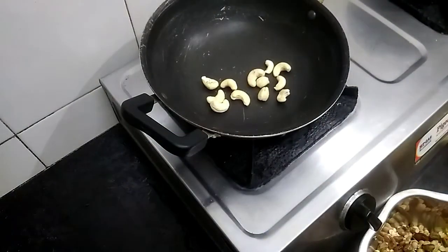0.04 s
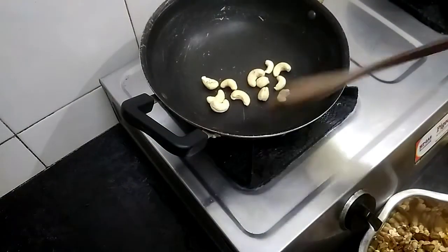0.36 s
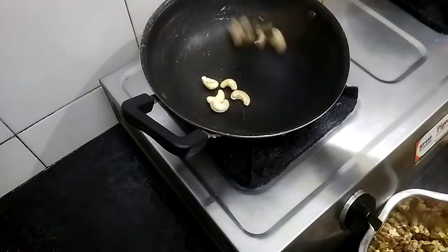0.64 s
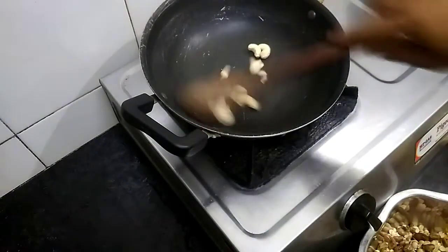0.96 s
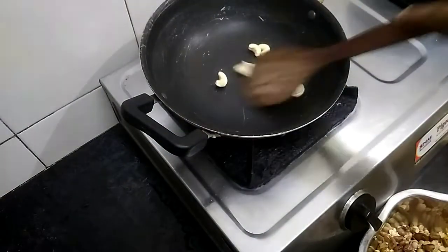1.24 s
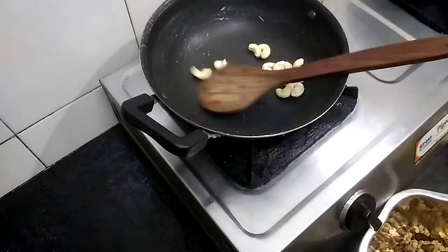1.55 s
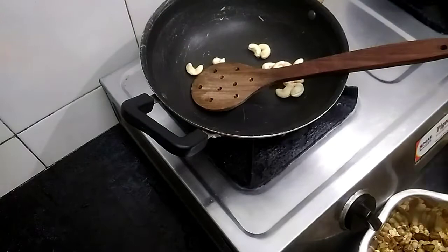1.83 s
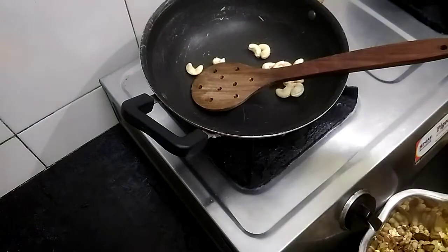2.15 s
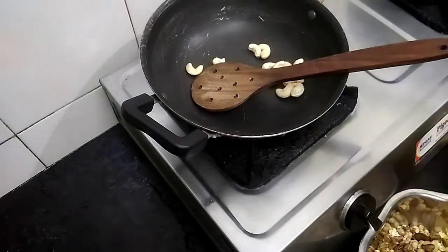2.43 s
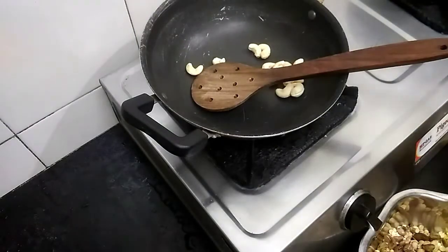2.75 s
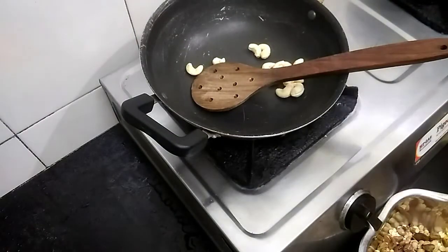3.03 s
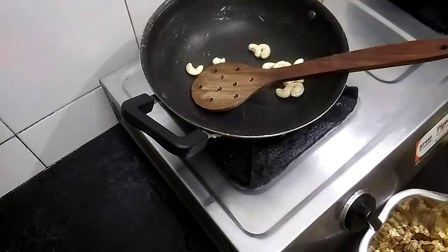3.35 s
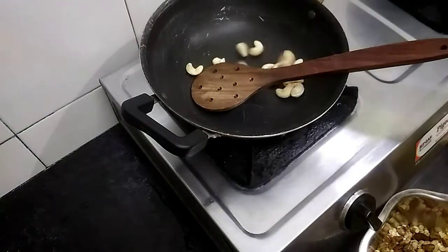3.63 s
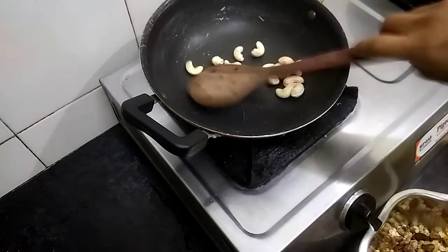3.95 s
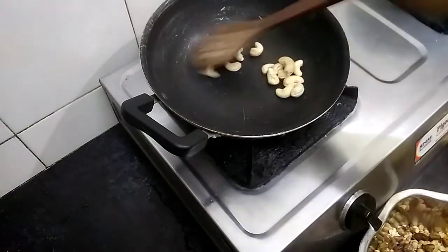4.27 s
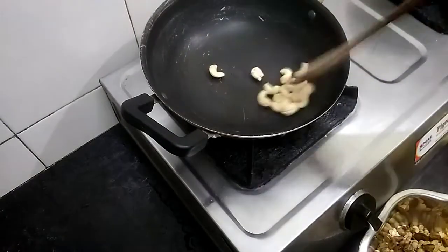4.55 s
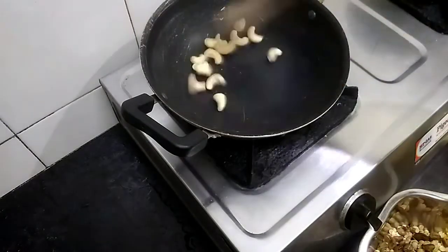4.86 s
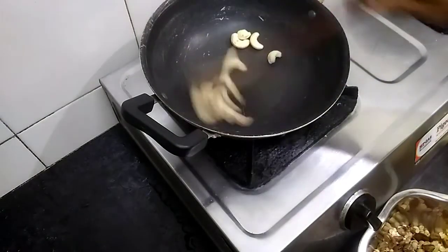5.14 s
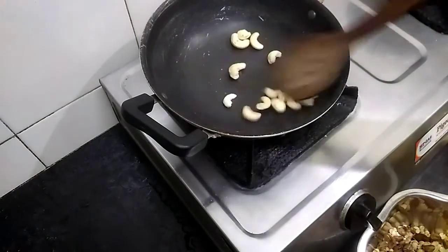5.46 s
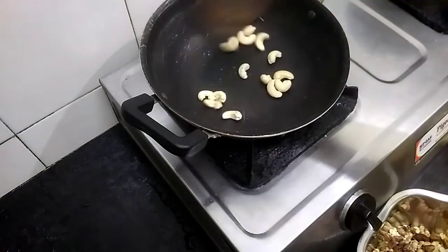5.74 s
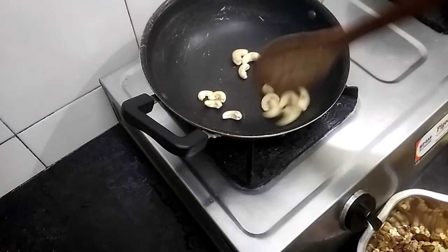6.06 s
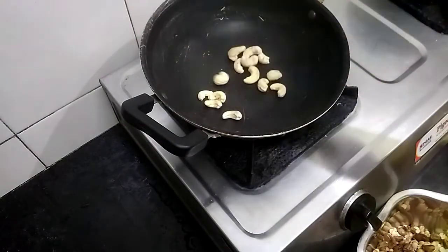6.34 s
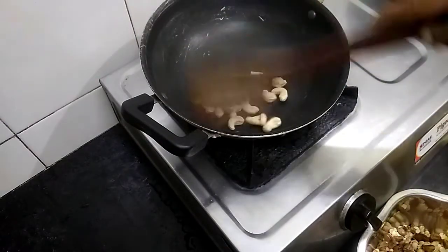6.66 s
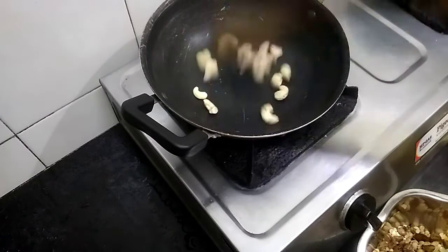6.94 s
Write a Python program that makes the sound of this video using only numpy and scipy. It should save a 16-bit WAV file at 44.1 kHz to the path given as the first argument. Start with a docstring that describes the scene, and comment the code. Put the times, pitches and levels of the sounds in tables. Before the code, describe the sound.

Close by, cashews rattle and click in a dry metal pan as a wooden spoon knocks and briefly scrapes it. The stirring stops, and distant drip-like ticks come through over the soft, steady rumble of a gas flame. Nuts then clatter lightly onto the metal and a longer round of stirring follows, with the loudest knock and some small snaps of roasting nuts near the end. A small kitchen adds a short echo.

```python
"""A gas burner rumbles in a small tiled kitchen. From 0.5 s a wooden spoon stirs cashews in a dry metal pan:
each impact excites the modes of floor, wall and stand, and the nuts click and slide. From 1.6 s the spoon
rests, leaving a distant tick three times a second, probably a dripping tap. At 3.6 s nuts drop and a hot
one snaps. Stirring resumes at 4.2 s and knocks hardest near 5 s; more nuts snap around 6.5 s."""
import sys
import numpy as np
from scipy import signal
from scipy.fft import rfft, irfft
from scipy.io import wavfile
from scipy.ndimage import uniform_filter1d

SR = 44100
rng = np.random.default_rng(int(sys.argv[2]) if len(sys.argv) > 2 else 0)


def unload_audio(sound):
    """Save the sound as a 16-bit wav file, at the path given as the first command line argument."""
    columns = np.transpose(np.atleast_2d(sound))
    # keep every value between -1 and 1, then stretch to whole-number steps
    steps = np.round(np.clip(columns, -1, 1) * 32767)
    wavfile.write(sys.argv[1], SR, steps.astype(np.int16))


N = 317284

# spectrum of the flame's rumble and faint hiss: frequency_hz, level_db
FLAME_SPECTRUM = [(15, -23), (30, -8), (48, -14), (66, -5.5), (150, -3.5), (205, -12.5), (300, -5),
                  (420, -7), (630, -16), (1000, -21), (2000, -27.5), (4000, -35.5), (9500, -36),
                  (13000, -46), (16000, -61.5)]
# reverberation of the kitchen: frequency_hz, level_db, t60_s
ROOM_BANDS = [(99, -7.5, 0.55), (193.5, 5.5, 0.15), (306, 1.5, 0.18), (615, -1, 0.32), (1088, -2, 0.2),
              (2240, -7.5, 0.27), (3640, -0.5, 0.19), (6334, -3, 0.33), (10400, -6, 0.27),
              (14900, 0.5, 0.38)]
# acoustic shadow of the phone's body at the right microphone: frequency_hz, gain_db
SHADOW_SPECTRUM = [(100, -2), (300, -5.5), (700, -6), (1300, -6), (2700, -6), (5000, -9.5), (7000, -8.5),
                   (9000, 0), (16000, 2)]
# spectrum of a small hard contact: frequency_hz, level_db
CLICK_SPECTRUM = [(300, -43), (900, 4), (2500, -1.5), (3600, -4.5), (5500, -1.5), (7000, 1), (10000, -4),
                  (13000, -15), (16000, -24.5)]
# modes of the pan rocking on its stand, of its floor and of its wall: frequency_hz, level_db, t60_s
STAND_MODES = [(180, -18.5, 0.34), (234, -4.5, 0.097), (274, -5, 0.12), (301.1, 1, 0.13), (367, 4, 0.05),
               (389.3, -5, 0.33), (431, -3, 0.23), (607, -8.5, 0.37)]
FLOOR_MODES = [(656, -10.5, 0.055), (790, -4, 0.04), (800, -5.5, 0.1), (880, 2, 0.035), (1072, 3, 0.028),
               (1160, 2, 0.037), (1132, 7.5, 0.072), (1230, -11.5, 0.0067), (1525, -1, 0.033),
               (1680, -0.5, 0.099), (2050, 1, 0.025), (2400, -4, 0.015)]
WALL_MODES = [(1487, -18, 0.3), (1561, -1.5, 0.055), (1810, -3.5, 0.012), (2647, 0, 0.026),
              (2680, -34.5, 0.17), (2910, -13, 0.033), (3220, -13, 0.021), (4350, 5.5, 0.0028),
              (6360, -10, 0.055)]
# drops striking the sink: start_s, splat_db, splat_hz, ping_db, ping_hz, sink_db
TAP_DRIPS = [(0.1957, -37, 8000, -52.5, 5940, -64), (0.206, -33.5, 8200, -49, 7000, -44.5),
             (1.612, -40, 6440, -47, 5270, -60), (1.9351, -44.5, 8960, -52.5, 5270, -63.5),
             (2.278, -31.5, 8500, -29, 5530, -34.5), (2.627, -38, 9500, -45.5, 10100, -54),
             (2.95, -41.5, 8000, -40, 6300, -58.5), (3.2765, -31, 7440, -34.5, 5560, -39.5),
             (3.955, -48, 6000, -45, 5280, -63.5), (3.994, -48.5, 13000, -59.5, 7040, -71),
             (5.369, -47, 7470, -53.5, 6070, -68.5), (6.034, -41.5, 7460, -68, 7000, -57)]
# hot nuts snapping: start_s, crack_db, ping_db, ping_hz
NUT_SNAPS = [(3.632, -42, -32, 5830), (6.4625, -28, -19, 6100), (6.485, -32.5, -37, 6300),
             (6.564, -38.5, -40, 6430)]
# low rumbles that swell and fade: start_s, length_s, level_db, pitch_hz
LOW_SWELLS = [(.09, 0.037, -51, 357), (.33, 0.029, -56, 390), (4.3, .1, -57.5, 300),
              (5.85, 0.25, -52.5, 102.4), (6.42, 0.17, -57, 90), (6.79, 0.073, -56.5, 298),
              (6.97, 0.11, -55, 90)]
# the spoon sweeping through the nuts: start_s, length_s, rattle_db, scrape_db, sing_db, judder_db
SPOON_SWEEPS = [(0.5, 0.067, -50, -38.5, -70, -54), (0.574, 0.13, -87, -64, -62, -64),
                (0.807, 0.12, -45.5, -59.5, -65, -60.5), (0.912, 0.062, -50.5, -64, -71, -76),
                (1.369, 0.11, -79, -41.5, -45, -47), (1.519, 0.11, -85, -75, -73, -61.5),
                (4.232, 0.073, -46.5, -53, -68, -55), (4.591, 0.11, -51.5, -54, -65, -64),
                (4.921, 0.096, -73, -66.5, -73, -80), (4.992, 0.14, -50.5, -63, -73, -68.5),
                (5.948, 0.057, -85, -74.5, -71.5, -71.5), (6.181, 0.068, -92.5, -73, -66, -77),
                (6.396, 0.14, -57.5, -57, -55.5, -55.5), (6.712, 0.062, -46.5, -52, -65, -50.5),
                (6.99, 0.093, -43.5, -60, -66, -60.5)]
# single nuts landing on metal: start_s, click_db, click_hz, ping_relative_db, wall_db, wall_focus_hz
NUT_FALLS = [ (0.4732, -37.5, 9800, -2.5, -52, 1770), (0.544, -37, 1700, -6, -35.5, 1680),
             (0.6369, -38, 1900, -6, -43.5, 2107), (0.69, -62, 1800, -16, -47.5, 2006),
             (0.7024, -59, 1700, -5, -51.5, 1736), (0.7327, -65, 2300, -4.5, -49, 1898),
             (0.8263, -26, 2700, -7, -38, 1820), (0.895, -42, 2300, -2, -33, 2130),
             (0.9745, -55, 7000, -4, -45.5, 2200), (1.001, -45, 10000, 7, -52, 2500),
             (1.054, -64, 2720, -1, -40, 2680), (1.1846, -31, 3600, -24, -25.5, 2270),
             (1.205, -38, 3800, -19, -56, 2600), (3.583, -26.5, 7140, -36, -34, 2770),
             (3.604, -32.5, 3200, -22, -33.5, 2150), (3.6632, -36, 7400, -17, -39, 1550),
             (3.6688, -39, 1940, 8, -29, 1730), (3.725, -46, 2600, -5, -36.5, 2400),
             (3.741, -48, 2600, -4, -47, 2690), (3.827, -52, 2900, -6, -38.5, 2770),
             (4.286, -35.5, 3000, -5.5, -44, 2630), (4.353, -50, 2200, 3, -58, 2300),
             (4.926, -56, 2500, -1, -50, 2600), (5.2959, -51, 1820, 1.5, -52.5, 1870),
             (5.8347, -46, 2300, 4.5, -52, 1960), (6.0915, -51.5, 1817, 13.5, -53, 1677),
             (6.163, -57, 2600, -11.5, -58, 2590), (6.757, -50, 3500, -6, -55, 1800),
             (7.036, -28.5, 6200, 7.5, -46.5, 2580), (7.074, -41, 2950, -7, -42, 2300),
             (7.165, -49.5, 1790, 0, -59, 2040)]
# the spoon striking the pan: start_s, knock_db, contact_hz, contact_q, floor_db, thud_db, thud_hz,
# wall_db, crunch_db, crunch_hz, crunch_fade_s
SPOON_KNOCKS = [ (0.483, -9.5, 1010, 1.86, -21, -29, 330, -15, -13, 5900, 0.001),
                (0.765, -8, 1570, 0.98, -18, -30.5, 285, -24, -34, 5950, 0.00091),
                (1.3628, -34, 1360, 3.3, -32.5, -29.5, 290, -55, -21, 6400, 0.0046),
                (1.3792, -21, 1700, 2.3, -38, -28, 260, -31, -29, 6300, 0.0027),
                (1.423, -31, 1700, 1.2, -43, -34, 290, -30.5, -48, 5000, .002),
                (1.451, -20.5, 880, 0.76, -38, -30, 260, -49, -60, 5000, .002),
                (1.479, -35, 900, 0.74, -38, -31.5, 270, -55, -63, 5000, .002),
                (1.577, -50, 1086, 2, -49, -44.5, 287, -73, -70, 5000, .002),
                (4.185, -4.5, 1207, 0.58, -15.5, -25.5, 262.4, -23, -19.5, 6370, 0.0018),
                (4.5618, -16.5, 1530, 5.9, -30, -24.5, 301.6, -26, -15, 5260, 0.0016),
                (4.978, 0, 1702, 0.57, -18, -25, 273, -20, -28.5, 9950, .0006),
                (5.5067, -22, 1154, 0.75, -37, -29, 410, -8.5, -21, 4600, 0.00091),
                (5.7003, -17, 1250, 1.13, -32.5, -40.5, 270, -31, -20.5, 7500, 0.0028),
                (6.369, -25.5, 1367, 1.8, -22, -46.5, 295, -29.5, -18.5, 6460, 0.0032),
                (6.381, -11.5, 1290, 0.64, -16.5, -28.5, 298, -29, -25, 6200, .0015),
                (6.6967, -16, 1630, 5.6, -25.5, -27.5, 300, -25, -25.5, 6900, 0.001),
                (6.722, -26.5, 1340, 0.75, -27.5, -36, 297, -44, -25, 5530, 0.0025),
                (6.777, -28.5, 1610, 0.5, -45, -39, 297, -41.5, -52, 5500, .002),
                (6.9842, -28.5, 1045, 3.7, -35.5, -42, 382, -50, -20, 3330, 0.0032),
                (6.995, -35, 1090, 1.8, -28, -45.5, 373, -27.5, -19.5, 6500, 0.0016)]


def undb(db):
    """Amplitude grows tenfold every 20 decibels."""
    return 10 ** (np.asarray(db) / 20)


def seconds(length_s):
    """Uniform sampling gives the time axis of a short sound."""
    return np.arange(max(int(length_s * SR), 8)) / SR


def unit(x):
    """Energy normalisation, to that of one millisecond at full scale."""
    return x * np.sqrt(SR / 1000 / np.sum(x ** 2))


def unit_rms(x, length_s):
    """Power normalisation, to an rms of 1 over the given length."""
    return x / np.sqrt(np.sum(x ** 2) / (length_s * SR))


def add(track, start_s, x):
    """Superposition: a sound adds to what the track already holds."""
    i = max(int(start_s * SR), 0)
    track[i:i + len(x)] += x[:max(len(track) - i, 0)]


def on_log(hz, points, column=1):
    """Interpolation of a table along a logarithmic frequency axis."""
    table = np.array(points, float)
    return np.interp(np.log(np.maximum(hz, 1)), np.log(table[:, 0]), table[:, column])


def colour(x, spectrum, size=512):
    """Minimum-phase filtering: folding the cepstrum gives the spectrum a causal response."""
    gain = undb(on_log(np.fft.rfftfreq(size, 1 / SR), spectrum))
    cepstrum = irfft(np.log(gain))
    fold = np.r_[1, np.full(size // 2 - 1, 2), 1, np.zeros(size // 2 - 1)]
    response = irfft(np.exp(rfft(cepstrum * fold)))
    return signal.fftconvolve(x, response)[:len(x)]


def band(x, hz, q):
    """Second-order resonance, with gain 1 at its centre."""
    w = 2 * np.pi * min(hz, .45 * SR) / SR
    a = np.sin(w) / (2 * q)
    return signal.lfilter([a, 0, -a], [1 + a, -2 * np.cos(w), 1 - a], x)


def cut(x, hz, side, order):
    """Maximally flat low-pass or high-pass filtering."""
    return signal.sosfilt(signal.butter(order, hz, side, fs=SR, output="sos"), x)


def waver(rate_hz):
    """Random modulation: smoothed steps with a spread near 1."""
    hold = int(SR / rate_hz)
    steps = np.repeat(rng.standard_normal(N // hold + 1), hold)
    return uniform_filter1d(steps, hold)[:N]


def diffuse_spectra(samples, wide_hz):
    """A diffuse field is coherent at two close microphones in the bass, unrelated above wide_hz."""
    mid, side = rfft(rng.standard_normal((2, samples)))
    angle = np.pi / 4 * np.clip(np.fft.rfftfreq(samples, 1 / SR) / wide_hz, .1, 1)
    return np.cos(angle) * mid + np.sin(angle) * side * np.array([[1], [-1]])


def ring(modes, focus_hz, db_per_octave, scatter_db, detune):
    """Free vibration is a sum of damped modes; the place of contact favours those near focus_hz."""
    t = seconds(.4)
    hz, db, t60 = np.array(modes, float).T[:, :, None]
    weight, shift = rng.standard_normal((2, len(modes), 1))
    sign = rng.choice([-1, 1], (len(modes), 1))
    octaves_off = np.abs(np.log2(hz / focus_hz))
    gain = sign * undb(db + scatter_db * weight - db_per_octave * octaves_off)
    tones = np.sin(2 * np.pi * hz * (1 + detune * shift) * t)
    decay = np.exp(-np.log(1000) * t / t60)
    return unit(np.sum(gain * tones * decay, axis=0))


def grains(t, per_s, spread_db):
    """Shot noise: tiny contacts of uneven size at random moments."""
    hit = rng.random(len(t)) < per_s / SR
    return hit * rng.choice([-1, 1], len(t)) * undb(spread_db * rng.standard_normal(len(t)))


def chatter(fade_s, rise_s=.0011):
    """A hard contact is a burst of micro-impacts that builds and dies within milliseconds."""
    t = seconds(.04)
    envelope = np.exp(-t / fade_s) * (1 - np.exp(-t / rise_s)) ** 2
    return colour(grains(t, per_s=9000, spread_db=9) * envelope, CLICK_SPECTRUM)


def ping(hz, ring_s):
    """A small body rings briefly as a damped oscillator."""
    t = seconds(.04)
    return unit(np.sin(2 * np.pi * hz * t) * (np.exp(-t / ring_s) - np.exp(-4 * t / ring_s)))


def tick(hz, fade_s, q, ring_s, tone_db):
    """An impact radiates contact noise together with the struck body's own ring."""
    contact = unit(band(chatter(fade_s), hz, q))
    return unit(contact + undb(tone_db) * ping(hz, ring_s))


def drag(length_s, hz, q):
    """Stick-slip friction: an unbroken run of small catches and slips that come in bunches."""
    t = seconds(.45)
    bunches = undb(3 * waver(90)[:len(t)])
    pressure = np.sqrt(np.abs(np.sin(np.pi * np.minimum(t / length_s, 1))))
    slips = grains(t, per_s=1800, spread_db=3) * bunches * pressure
    for stage_q in (q, .7, .5):
        slips = band(slips, hz, stage_q)
    return unit_rms(slips, length_s)


def burner(flame_db=-59.5, hum_db=-75, hum_hz=99):
    """Combustion noise: the flame rumbles and flutters over a faint wavering hum."""
    shape = undb(on_log(np.fft.rfftfreq(N, 1 / SR), FLAME_SPECTRUM))
    flame = irfft(diffuse_spectra(N, wide_hz=1240) * shape, N)
    flame = flame / np.std(flame) * undb(flame_db - 2 * waver(6.1))
    hum_peak = np.sqrt(2) * undb(hum_db + 1.4 * waver(2.5))
    hum_phase = 2 * np.pi * np.cumsum(hum_hz + 2 * waver(.96)) / SR
    return (flame + hum_peak * np.sin(hum_phase)) * undb([[2.5], [-2.5]])  # louder on the left


def kitchen(x):
    """Reverberation: dense reflections from the tiles build up, then decay at each band's own rate."""
    t = seconds(.76)
    hz = np.fft.rfftfreq(len(t), 1 / SR)
    centres = np.geomspace(70, 16000, 17)
    noise, echo = diffuse_spectra(len(t), wide_hz=1270), 0
    for centre, selector in zip(centres, np.eye(len(centres))):
        band_noise = irfft(noise * np.interp(hz, centres, selector), len(t))
        build_s = .00089 + 3 / centre  # room modes take a few cycles to build up
        t60 = on_log(centre, ROOM_BANDS, column=2)
        fade = np.exp(-np.log(1000) * t / t60) * (1 - np.exp(-t / build_s))
        echo = echo + undb(on_log(centre, ROOM_BANDS)) * band_noise * fade / np.linalg.norm(fade)
    return signal.fftconvolve(x[None], echo, axes=1)[:, :N]


def dripping_tap(sink_hz=3330):
    """Drop impact: a splat with fine spray, a rough ping and a knock on the hollow body of the sink."""
    out = np.zeros(N)
    for start, splat_db, splat_hz, ping_db, ping_hz, sink_db in TAP_DRIPS:
        splat = band(chatter(fade_s=.0021, rise_s=.003), splat_hz, q=1.5)
        splat = cut(splat, 5240, "high", order=6)
        spray = cut(chatter(fade_s=.0012), 11000, "high", order=6)
        add(out, start, undb(splat_db) * (unit(splat) + undb(-8.5) * unit(spray)))
        add(out, start, undb(ping_db) * tick(ping_hz, fade_s=.003, q=8, ring_s=.0018, tone_db=-2))
        add(out, start, undb(sink_db) * tick(sink_hz, fade_s=.003, q=.7, ring_s=.0012, tone_db=-2))
    return out


def low_swells():
    """Narrow-band noise under a rising and falling envelope is heard as a brief pitched rumble."""
    out = np.zeros(N)
    for start, length, level_db, hz in LOW_SWELLS:
        add(out, start, undb(level_db) * drag(length, hz, q=8.3))
    return out


def snapping_nuts():
    """A short transient has a broad spectrum: a hot nut cracks, with a ping of a millisecond or two."""
    out = np.zeros(N)
    for start, crack_db, ping_db, ping_hz in NUT_SNAPS:
        crack = cut(chatter(fade_s=.0005, rise_s=.0002), 1800, "high", order=2)
        add(out, start, undb(crack_db) * unit(crack))
        add(out, start, undb(ping_db) * ping(ping_hz, ring_s=.0005))
    return out


def rattle(length_s, skips_per_s=100, low_hz=5500, high_hz=10500, range_db=14):
    """Repeated impact: sliding nuts skip, each at its own pitch, over gritty clicks and friction hiss."""
    skips, grit = np.zeros((2, len(seconds(.45))))
    count = int(length_s * skips_per_s) + 1
    for k, (jitter, pitch, size, hardness) in enumerate(rng.random((count, 4))):
        start = length_s * (k + jitter) / count
        hz = low_hz * (high_hz / low_hz) ** pitch
        burr = unit(band(chatter(fade_s=.003), hz, q=6))
        add(skips, start, undb(range_db * size) * burr)
        add(grit, start, undb([range_db * hardness]))
    grit = band(colour(grit, CLICK_SPECTRUM), high_hz, q=.76)
    hiss = drag(length_s, hz=7600, q=.56)
    return unit_rms(skips, length_s) + undb(-4) * unit_rms(grit, length_s) + undb(-8) * hiss


def spoon_sweeps(sing_hz=1650):
    """Friction forces vibration: nuts rattle, wood scrapes, the wall sings and the pan judders."""
    out = np.zeros(N)
    for start, length, rattle_db, scrape_db, sing_db, judder_db in SPOON_SWEEPS:
        add(out, start, undb(rattle_db) * rattle(length))
        add(out, start, undb(scrape_db) * drag(length, hz=1220, q=.23))
        friction = drag(length, sing_hz, q=1.2)
        wall = ring(WALL_MODES, sing_hz, db_per_octave=7, scatter_db=2, detune=.02)
        add(out, start, undb(sing_db) * unit_rms(signal.fftconvolve(friction, wall), length))
        add(out, start, undb(judder_db) * drag(1.3 * length, hz=268, q=1.3))  # outlasts the sweep
    return out


def falling_nuts(damp_s=.0093, contact_s=.0014):
    """Contact damping: a nut clicks and rings the pan wall, then stills it by coming to lie there."""
    out = np.zeros(N)
    for start, click_db, click_hz, ping_db, wall_db, wall_hz in NUT_FALLS:
        wall = ring(WALL_MODES, wall_hz, db_per_octave=26, scatter_db=2.5, detune=.022)
        click = tick(click_hz, fade_s=.0014, q=.8, ring_s=.0006, tone_db=ping_db)
        t = np.arange(len(wall)) / SR
        envelope = (1 - np.exp(-t / contact_s)) * np.exp(-t / damp_s)
        add(out, start, undb(click_db) * click)
        add(out, start, undb(wall_db) * unit(wall * envelope))
    return out


def spoon_knocks(place_count=3, floor_lag_s=.0022, thud_rise_s=.0039):
    """Impulse excitation: one short push rings floor, stand and wall and crunches the nuts under it."""
    places = np.zeros((place_count, N))  # one track for each place of contact, struck in turn
    impulse = signal.unit_impulse(256)
    crack = unit(colour(impulse, CLICK_SPECTRUM))  # the first instant of contact
    for k, (start, knock_db, hz, q, floor_db, thud_db, thud_hz,
            wall_db, crunch_db, crunch_hz, crunch_fade_s) in enumerate(SPOON_KNOCKS):
        out = places[k % place_count]
        push = band(band(impulse, hz, q), hz, q)
        push = cut(push, 2390, "low", order=8)  # soft wood passes nothing fast into the metal
        push = unit(cut(push, 614, "high", order=3))  # a small contact radiates little bass
        add(out, start, undb(knock_db - 4.5) * push)
        add(out, start, undb(knock_db - 22) * crack)
        # the floor rings once the push has spread; a sharply pitched contact picks out fewer modes
        floor = ring(FLOOR_MODES, hz, db_per_octave=3.5 * q, scatter_db=2, detune=.008)
        add(out, start + floor_lag_s, undb(floor_db) * unit(signal.fftconvolve(push, floor)))
        thud = ring(STAND_MODES, thud_hz, db_per_octave=19, scatter_db=2, detune=.012)
        rise = 1 - np.exp(-np.arange(len(thud)) / SR / thud_rise_s)  # the heavy pan is slow to rock
        add(out, start, undb(thud_db + 3) * unit(thud * rise))
        wall = ring(WALL_MODES, focus_hz=2900, db_per_octave=7, scatter_db=1, detune=.004)
        add(out, start, undb(wall_db) * wall)
        crunch = chatter(crunch_fade_s, rise_s=.0006)
        nut_resonance = undb(-6.5) * unit(band(crunch, crunch_hz, q=5.1))
        add(out, start, undb(crunch_db) * unit(unit(crunch) + nut_resonance))
    return places


def scene():
    """Direct and reverberant fields add; the left microphone faces the pan, the right lies in shadow."""
    knocks, clicks, snaps = spoon_knocks(), falling_nuts(), snapping_nuts()
    drags = spoon_sweeps() + low_swells()
    tap = dripping_tap()
    small_sounds = clicks + snaps + drags + undb(-2) * tap
    # each place of contact, and the sink, has its own reflections; the snaps stay nearly dry
    room_feeds = [*knocks, undb(2.5) * clicks + undb(-10) * snaps + drags, undb(2) * tap]
    echo_left, echo_right = sum(kitchen(feed) for feed in room_feeds)
    left = knocks.sum(axis=0) + small_sounds + echo_left
    # path difference: the right microphone leads by 0 to 2 samples, depending on the place of contact
    early = sum(np.roll(place, -k) for k, place in enumerate(knocks)) + np.roll(small_sounds, -1)
    right = colour(undb(-5) * early + undb(.5) * echo_right, SHADOW_SPECTRUM)
    return np.array([left, right]) + burner()


def record(dry, top_hz=16000):
    """Saturation and band limiting: the phone clips at full scale and cuts the highest treble."""
    low_pass = signal.ellip(8, .2, 70, top_hz, fs=SR, output="sos")
    return signal.sosfilt(low_pass, np.clip(dry, -1, 1))


dry = scene()
out = record(dry)
unload_audio(out)
```